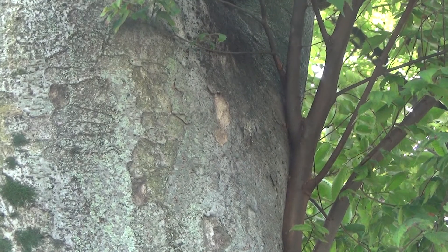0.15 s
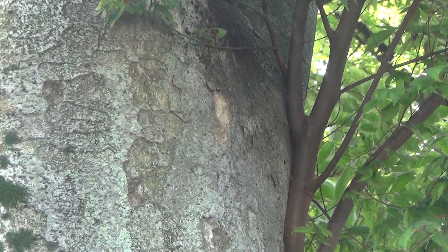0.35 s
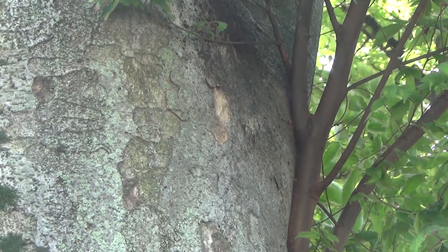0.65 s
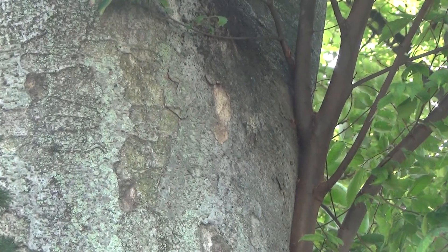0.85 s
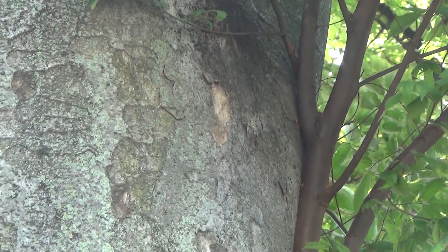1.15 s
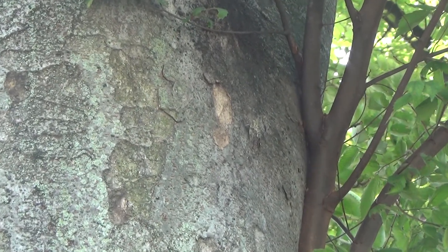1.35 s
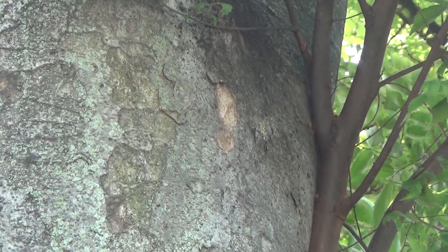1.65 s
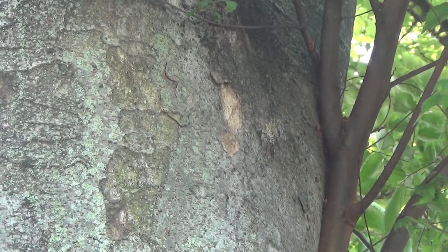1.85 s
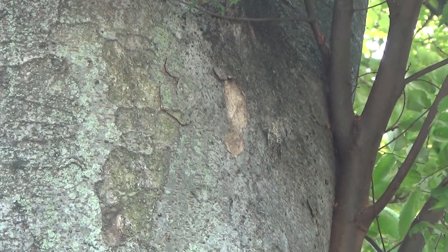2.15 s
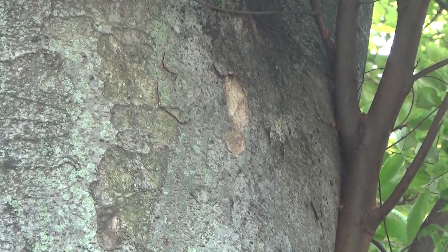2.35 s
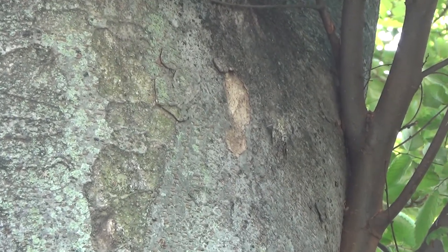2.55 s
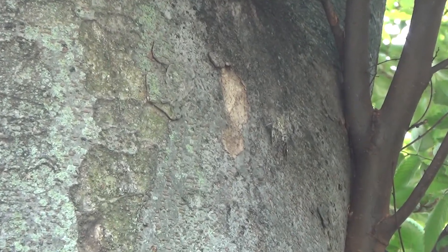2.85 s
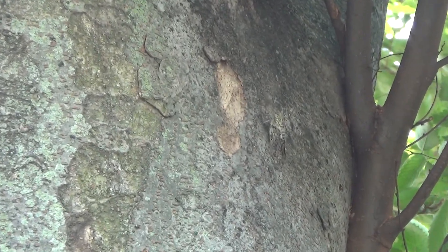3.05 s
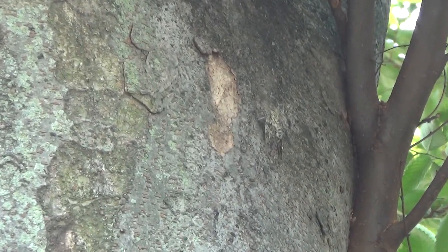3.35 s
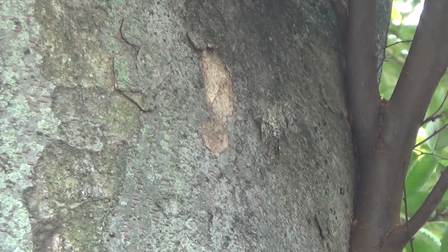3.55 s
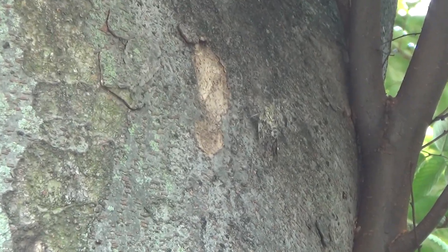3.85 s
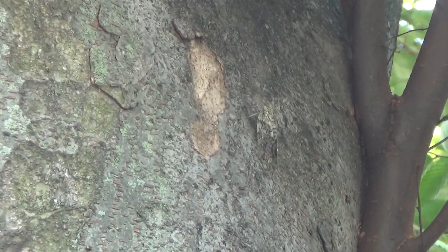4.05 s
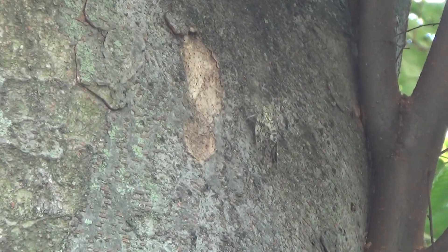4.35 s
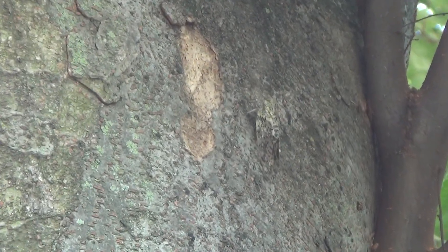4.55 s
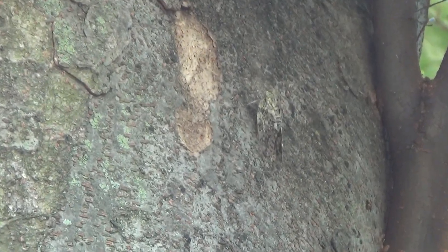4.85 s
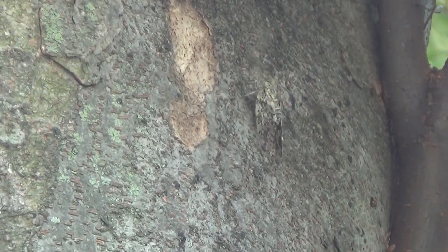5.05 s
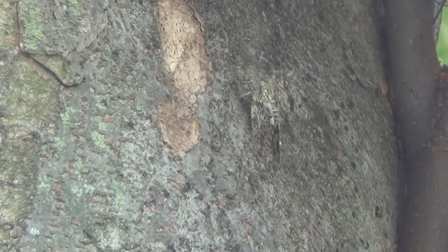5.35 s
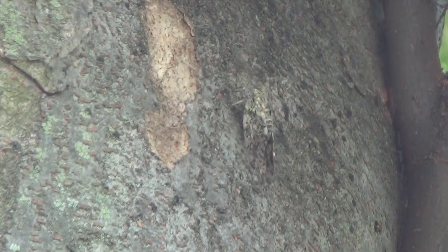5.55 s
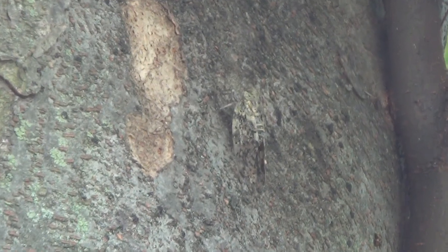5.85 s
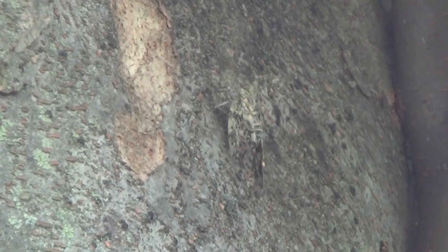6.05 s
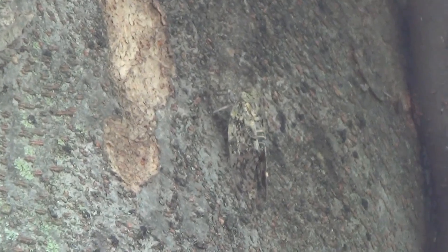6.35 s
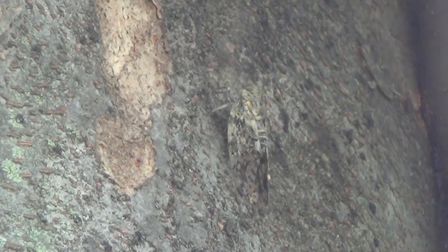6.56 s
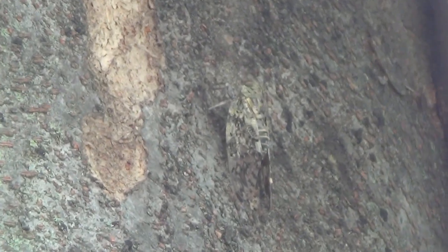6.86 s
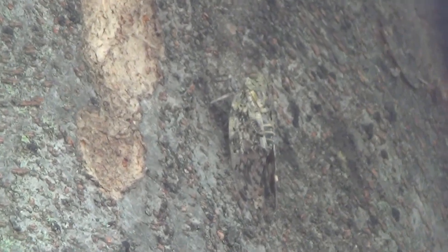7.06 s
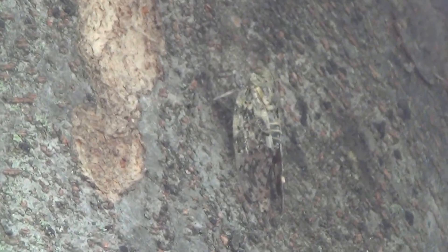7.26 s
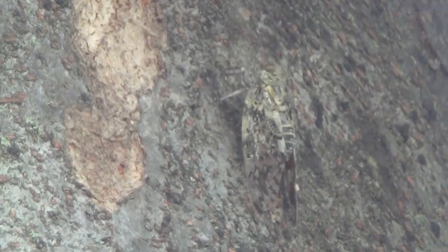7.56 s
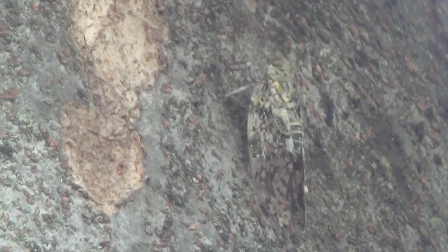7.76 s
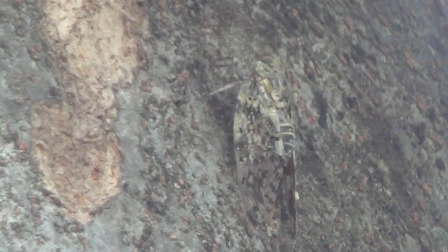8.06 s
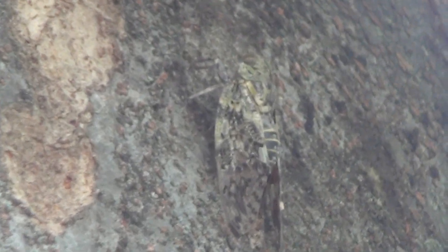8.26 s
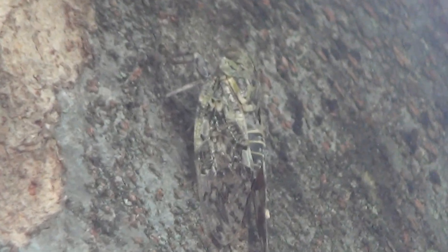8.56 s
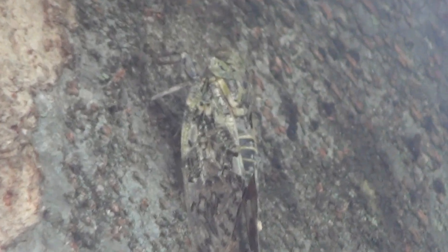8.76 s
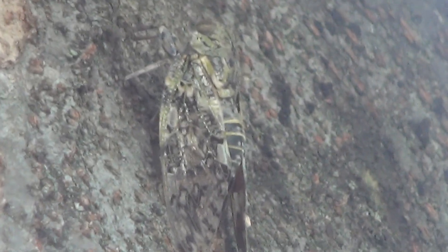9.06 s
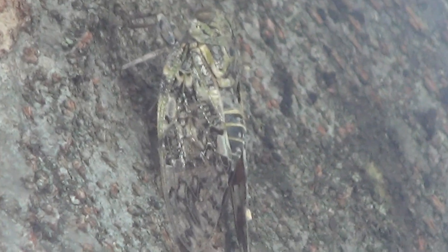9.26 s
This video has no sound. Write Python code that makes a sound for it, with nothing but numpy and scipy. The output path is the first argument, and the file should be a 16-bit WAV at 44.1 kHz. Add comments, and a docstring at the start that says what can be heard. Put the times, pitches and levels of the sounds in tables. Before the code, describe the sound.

A continuous, piercing cicada buzz fills the foreground, centred and nearly dry, with short reflections off trunk and foliage. First rough and throbbing, it tightens and grows slightly louder while its tone lowers; midway it snaps upward into a cleaner, quivering shrill held to the end. Beneath it a vehicle's soft engine drone and tyre roar swell and fade to the left in faint open air, heard on a close stereo microphone.

```python
"""A harsh cicada buzz, close by, quickens and sinks in pitch, then snaps up to a brighter, fluttering shrill.
Its tymbals click some 500 times a second, and each click rings the hollow abdomen; trunk, ground and leaves echo it.
Behind it a motor vehicle passes faintly, leaning to the left: filtered-noise rumble and tyres, exhaust harmonics
and a transmission whine. Shaped noise gives a faint hush of open air."""
import sys
import numpy as np
from scipy import signal
from scipy.fft import rfft, irfft
from scipy.io import wavfile
from scipy.ndimage import uniform_filter1d, minimum_filter1d

SR = 44100
rng = np.random.default_rng(int(sys.argv[2]) if len(sys.argv) > 2 else 0)


def bounce(signal):
    """Save signal as a 16-bit WAV file at the path given by the first command-line argument."""
    frames = np.transpose(np.atleast_2d(signal))
    limited = np.clip(frames, -1, 1)
    pcm = np.round(limited * 32767).astype(np.int16)
    wavfile.write(sys.argv[1], SR, pcm)


N = 415422
TIME = np.arange(N) / SR

# song phrases; clicks run early and late in a fast flutter and a slow throb:
# (start [s], ring time [ms], roughness [0-1], second rib click [dB], abdomen stretch [0-1],
#  flutter rate [Hz], flutter depth [us], throb rate [Hz], throb depth [us])
PHRASES = [(0, 0.22, .52, -34, 0.3, 70.4, 17, 35.8, 95), (2.15, 0.21, .46, -16, 0.16, 125, 9.4, 30, 97),
           (4.621, 0.18, .08, -18, 0.83, 81.9, 42.6, 20, 7.9),
           (5.582, 0.18, .3, -27, 1, 77.2, 30.5, 24, 20.8),
           (6.221, 0.19, 0.27, -12, 0.96, 110.2, 24.4, 29, 10.5)]
# radiation of the slack abdomen: (frequency [Hz], level [dB])
SLACK_ABDOMEN = [(3000, 33), (5200, 4), (5450, -4.5), (5750, -4), (6400, -1), (6900, -1), (7700, 0),
                 (8400, -1), (8700, -2.5), (9100, 1), (9500, -6), (11000, 0), (12500, -1), (15500, 12)]
# radiation of the stretched abdomen: (frequency [Hz], level [dB])
STRETCHED_ABDOMEN = [(3000, -62), (5500, -3), (5950, 6.5), (6250, -2), (6700, 3), (6950, 3.5), (7700, 1.5),
                     (8450, 4.5), (8700, -2), (9100, 5.5), (10400, 3), (10800, 0.5), (12500, 9.5),
                     (15500, 0)]
# the first entry is a further click of a tymbal rib just after each click; the rest are reflections from bark,
# branches and ground: (delay [ms], gain [ratio])
ECHOES = [(.873, .1), (1.44, .15), (1.922, .11), (2.761, .09), (3.469, .1), (7.857, .28)]
# foliage scatter, strongest in the treble: (frequency [Hz], level [dB])
FOLIAGE = [(5500, -2.5), (8000, 2), (10000, 9), (14000, 13)]
# scatter from branches at either side: (frequency [Hz], level [dB])
BRANCHES = [(5500, -6), (7400, 2), (9300, 4), (10500, -25)]
# road rumble spectrum: (frequency [Hz], level [dB])
RUMBLE = [(15, -41), (25, -8), (81, -0.5), (166, -2), (195, -4), (257, -5.5), (295, -9.5), (375, -8.5),
          (500, -11.5), (650, -11), (1100, -120)]
# tyre roar spectrum: (frequency [Hz], level [dB])
TYRES = [(210, -21), (350, -1.5), (478, -8), (624, -2), (738, 1.5), (1140, 1), (1700, -2), (2240, -4),
         (4230, -20), (5000, -31), (6500, -5), (11000, -120)]
# swells of the road noise: (centre [s], half length to 1/e [s], rumble change [dB], tyre change [dB])
SWELLS = [(2.301, 0.31, 1.5, 2), (4.094, 0.65, -1, 2.5), (5.249, 0.37, -6.5, 4.5), (6.091, 0.28, -3, -2.5),
          (6.565, 0.1, 4, 3.5), (7.73, 0.79, 1, 3.5)]
# diffuse share of the road noise: (frequency [Hz], level [dB])
DIFFUSE_ROAD = [(40, -20), (130, -10), (260, -18), (600, -46), (2000, -50)]
# engine: (time [s], cycle rate [Hz], throttle [dB])
ENGINE = [(0, 34.97, -8), (1.7, 36.9, -5.5), (2.25, 38.49, 4), (3.8, 45.9, 2.5), (5.2, 42.48, -3),
          (6.6, 40.51, 0.5), (9.4, 39.57, 4)]
# exhaust tones: (multiple of cycle rate [1], level [dB])
EXHAUST = [(2, 0.5), (3, -1.5), (4, -3.5), (5, -7), (6, -4.5), (7, -14), (8, -14.5), (9, -10.5), (12, -5.5),
           (13, -30), (17, -5), (18, -2)]
# open-air hush spectrum: (frequency [Hz], level [dB])
AIR = [(15, -33), (25, -15), (74, -22.5), (141, -20), (320, -15), (794, -9), (927, -61), (2630, 3),
       (4480, 1), (5000, 2.5), (6500, -41), (11000, -120)]
# microphone ports: (frequency [Hz], left minus right [dB])
PORT_LEVEL = [(60, 1.5), (110, 3.5), (200, 4.2), (380, 3), (700, 2.5), (1290, 1), (2380, 0), (4400, 0.0),
              (8120, -0.4), (15000, 0.0)]

# buzz: one S-curve of effort brings faster clicks, a lower ring, a little more level
BUILD_MID_S, BUILD_WIDTH_S = 1.87, .91
EASY_CLICK_HZ, FULL_CLICK_HZ = 499, 581
EASY_RING_HZ, FULL_RING_HZ = 7840 * .99, 6614 * .99
EASY_DB, FULL_DB = -13, -11.5
# turn to the shrill, then tiring
TURN_S, SNAP_S, RELAX_S, SETTLE_S, SETTLE_SHARE = 4.62, .055, .08, .3, .16
SHRILL_CLICK_HZ, SHRILL_RING_HZ, SHRILL_DB = 496.4, 8152 * .99, -13
TIRING_HZ_PER_S, TIRING_DB_PER_S = 58 * .99, 0.16
FALTER_S, FALTER_WIDTH_S, FALTER_DB = 4.88, 0.16, -1.2
FLUTTER_SAG_HZ_PER_S = 3.8  # the flutter slows through each phrase
EDGE_HZ = 5560  # lowest resonance of the body
# tyres: nearest moment, time to fade by 3 dB; lead of the rumble over the tyres
PASS_S, PASS_WIDTH_S, RUMBLE_LEAD_S = 5.68, 1.31, 0.73
WHINE_START_S, WHINE_DB, WHINE_PEAK_S, WHINE_SPREAD_S = 4.57, -41.5, 4.88, 0.65
WHINE_LOW_HZ, WHINE_HIGH_HZ, WHINE_MID_S, WHINE_WIDTH_S = 1572, 2003, 5.25, .44
TOP_HZ = 15650  # recorder cutoff


def cicada(leaves_db=-8.5):
    """Clicks and their echoes, evened to a running level that follows the insect's effort."""
    click_hz, ring_hz, level_db = effort()
    # so small a body radiates little below its lowest resonance
    highpass = signal.butter(24, EDGE_HZ, "high", fs=SR, output="sos")
    clicks = signal.sosfilt(highpass, tymbals(click_hz, ring_hz))
    song = echoes(clicks) + undb(leaves_db) * leaves(clicks, t60_s=0.12, tint=FOLIAGE)
    running_rms = np.sqrt(uniform_filter1d(song ** 2, size=5000))
    return song / running_rms * undb(level_db)


def tymbals(click_hz, ring_hz, wander=.0035, slip_size_us=28, memory=0.75, weak_db=0.76, flutter_db=0.75,
            flutter_overtone=0.43, pitch_scatter=0.038, sag=0.12, swell=1.66):
    """Buckling clicks, uneven in time and strength, each followed by a second rib's click."""
    start_s, ring_ms, rough, rib_db, stretch, flutter_hz, flutter_us, throb_hz, throb_us = posture()
    turns = np.cumsum(click_hz * (1 + wander * rough * walk(14))) / SR
    t = np.interp(np.arange(1, int(turns[-1])), turns, TIME)

    sagging_hz = flutter_hz - FLUTTER_SAG_HZ_PER_S * (TIME - start_s)
    quiver = angle(sagging_hz * (1 + 0.0063 * walk(8.8)))
    flutter = np.sin(quiver) + flutter_overtone * np.sin(2 * quiver)
    # in each throb the click rate jumps up, then sinks
    beat = angle(throb_hz * (1 + 0.144 * walk(12)))
    throb = sum(np.cos(k * beat) / k ** 2 for k in range(1, 4))
    sway_us = np.interp(t, TIME, flutter_us * flutter + throb_us * throb)

    # curves sampled at the clicks
    curves = (flutter_db * flutter, ring_hz, ring_ms, rough, rib_db)
    force_db, ring_hz, ring_ms, rough, rib_db = (np.interp(t, TIME, c) for c in curves)
    chance = rng.standard_normal((len(t), 5)).T
    # a late click delays the ones after it
    slip_us = signal.lfilter([1], [1, -np.clip(memory, 0, .98)], slip_size_us * rough * chance[0])
    onset_s = t + (sway_us + slip_us) / 10 ** 6
    ring_s = ring_ms / 1000
    rib_lag_s = .00081 * (1 + .04 * chance[4])
    # most clicks are near full; now and then the tymbal only half buckles
    size = undb(force_db - weak_db * np.sqrt(np.abs(rough)) * chance[1] ** 2)
    rib_size = size * undb(rib_db + 2 * chance[3])
    pitch_hz = ring_hz * (1 + pitch_scatter * rough * chance[2])

    clicks = rings(onset_s, size, pitch_hz, ring_s, sag, swell)
    clicks = clicks + rings(onset_s + rib_lag_s, rib_size, pitch_hz, ring_s, sag, swell)
    # stretching the abdomen chokes its low resonances
    stretch = np.clip(stretch, 0, 1)
    return blend(colour(clicks, SLACK_ABDOMEN), colour(clicks, STRETCHED_ABDOMEN), stretch)


def rings(times_s, sizes, pitch_hz, ring_s, sag, swell, size=200):
    """Each click swells and dies in the abdomen, its pitch sagging as the rib gives way."""
    index = np.ceil(times_s * SR).astype(int)[:, None] + np.arange(size)
    age_s = np.maximum(index / SR - times_s[:, None], 0)
    life = age_s / ring_s[:, None]
    cycles = pitch_hz[:, None] * (age_s + sag * ring_s[:, None] * life * np.exp(-life / 2))
    envelope = sizes[:, None] * life ** swell * np.exp(-life)
    waves = envelope * np.sin(2 * np.pi * cycles)
    # overlapping rings add; samples outside the scene go to a spare or end bin
    return np.bincount(np.clip(index, 0, N).ravel(), waves.ravel(), N + 1)[:N]


def effort():
    """Click rate, ring pitch and level: all follow the build-up, then give way to the shrill."""
    build, snap, since_s = rise(BUILD_MID_S, BUILD_WIDTH_S), settle(TURN_S, SNAP_S), TIME - TURN_S
    # the muscles let go quickly at first, then settle slowly
    relax = blend(settle(TURN_S, RELAX_S), settle(TURN_S, SETTLE_S), SETTLE_SHARE)
    click_hz = blend(blend(EASY_CLICK_HZ, FULL_CLICK_HZ, build), SHRILL_CLICK_HZ, relax)
    shrill_hz = SHRILL_RING_HZ - TIRING_HZ_PER_S * since_s
    ring_hz = blend(blend(EASY_RING_HZ, FULL_RING_HZ, build), shrill_hz, snap)
    shrill_db = SHRILL_DB - TIRING_DB_PER_S * since_s
    level_db = blend(blend(EASY_DB, FULL_DB, build), shrill_db, snap)
    # the song falters just after the turn
    return click_hz, ring_hz, level_db + FALTER_DB * bump(FALTER_S, FALTER_WIDTH_S)


def posture():
    """Phrase columns at every moment; each phrase snaps in exponentially from the one before."""
    rows = np.array(PHRASES)
    snaps = np.array([settle(s, SNAP_S) for s in rows[1:, 0]])
    return rows[0][:, None] + np.diff(rows, axis=0).T @ snaps


def echoes(x):
    """The direct sound, a rib's quick after-click and a few hard reflections, as delays in the spectrum."""
    khz = np.fft.rfftfreq(N, 1 / SR) / 1000
    reflections = sum(gain * np.exp(-2j * np.pi * khz * ms) for ms, gain in ECHOES)
    return irfft(rfft(x) * (1 + reflections), N)


def leaves(x, t60_s, tint):
    """Short, dense scatter from bark and foliage: convolution with decaying noise."""
    t = TIME[:SR // 4]
    scatter = rng.standard_normal(len(t)) * np.exp(-np.log(1000) * t / t60_s)
    return colour(signal.fftconvolve(x, scatter / np.linalg.norm(scatter))[:N], tint)


def road(rumble_db=-44.0, tyre_db=-39.5, rumble_width_s=5, throttle_share=0.17, grain_db=1.0, clatter_db=1.025):
    """Far-carrying rumble and grainy tyre roar come and go; a clatter follows the engine cycle."""
    cycle_hz, throttle_db = read(ENGINE, TIME)
    rumble_pass_db = passing(PASS_S - RUMBLE_LEAD_S, rumble_width_s)
    rumble_level_db = rumble_db + throttle_share * throttle_db + rumble_pass_db
    tyre_level_db = tyre_db + passing(PASS_S, PASS_WIDTH_S)
    for at_s, width_s, low_db, high_db in SWELLS:
        swell = bump(at_s, width_s)
        rumble_level_db = rumble_level_db + low_db * swell
        tyre_level_db = tyre_level_db + high_db * swell
    crank = angle(cycle_hz)
    clatter = clatter_db * (np.cos(crank) + np.cos(2 * crank) + np.cos(4 * crank))
    rumble = noise(RUMBLE) * undb(rumble_level_db + 1.2 * walk(9))
    return rumble + noise(TYRES) * undb(tyre_level_db + clatter + grain_db * walk(70))


def motor(exhaust_db=-44, nearest_s=5.1, width_s=1.2, dulling=0.14):
    """Exhaust tones at multiples of the engine cycle, swelling as the vehicle goes by."""
    cycle_hz, throttle_db = read(ENGINE, TIME)
    crank = angle(cycle_hz * (1 + 0.00399 * walk(8)))
    far_db = passing(nearest_s, width_s)
    tones = 0
    for k, db in EXHAUST:
        # with distance the upper tones fade faster than the low ones
        gain = undb(db + k * dulling * far_db + 2.05 * walk(6.2))
        tones = tones + gain * np.sin(k * crank + rng.uniform(0, 2 * np.pi))
    return unit(tones) * undb(exhaust_db + throttle_db + far_db)


def whine(waver=0.0181, attack_s=0.019, patchy_db=2):
    """Transmission whine: a wavering, patchy sine that sets in suddenly, climbs and fades with distance."""
    hz = blend(WHINE_LOW_HZ, WHINE_HIGH_HZ, rise(WHINE_MID_S, WHINE_WIDTH_S))
    sine = np.sin(angle(hz * (1 + waver * walk(150))))
    tone = unit(sine * undb(2.46 * walk(40) + patchy_db * walk(7)))
    return tone * settle(WHINE_START_S, attack_s) * undb(WHINE_DB + passing(WHINE_PEAK_S, WHINE_SPREAD_S))


def passing(nearest_s, width_s):
    """Level in dB of a source that drives by, falling as 1 / distance; 0 when nearest."""
    return -20 * np.log10(np.hypot(1, (TIME - nearest_s) / width_s))


def noise(points):
    """Coloured noise of rms 1."""
    return unit(colour(rng.standard_normal(N), points))


def colour(x, points):
    """Filter by a spectrum of (frequency [Hz], level [dB])."""
    return irfft(rfft(x) * undb(across(points)), N)


def across(points):
    """A table of (frequency [Hz], value) spread over all bins, linear in log frequency."""
    hz, value = np.transpose(points)
    return np.interp(np.log(np.maximum(np.fft.rfftfreq(N, 1 / SR), 1)), np.log(hz), value)


def undb(db):
    """Decibels to gain."""
    return 10 ** (np.asarray(db) / 20)


def unit(x):
    """Scale to rms 1."""
    return x / np.sqrt(np.mean(x ** 2))


def read(table, t):
    """The columns of a curve at times t."""
    s, *columns = np.transpose(table)
    return [np.interp(t, s, c) for c in columns]


def walk(rate_hz):
    """Smooth chance of rms 1, changing about rate_hz times a second."""
    k = int(SR / rate_hz)
    steps = np.repeat(rng.standard_normal(N // k + 1), k)
    return unit(uniform_filter1d(steps, k)[:N])


def angle(hz):
    """Running phase of a frequency curve."""
    return 2 * np.pi * np.cumsum(hz) / SR


def rise(mid_s, width_s):
    """An S-curve from 0 to 1."""
    return (1 + np.tanh((TIME - mid_s) / width_s / 2)) / 2


def settle(start_s, lag_s):
    """0 until the start, then an exponential approach to 1."""
    return 1 - np.exp(-np.maximum(TIME - start_s, 0) / lag_s)


def bump(at_s, width_s):
    """A bell curve of height 1."""
    return np.exp(-((TIME - at_s) / width_s) ** 2)


def blend(a, b, share):
    """From a to b as the share goes from 0 to 1."""
    return a + (b - a) * share


def ports(mid, side):
    """Two close ports hear slightly different levels; diffuse sound differs between them."""
    half = undb(across(PORT_LEVEL) / 2)
    left = irfft(rfft(mid) * half, N) + side
    right = irfft(rfft(mid) / half, N) - side
    return np.array([left, right])


def scene(air_db=-56, scatter_db=-26, leftward=0.28, turn_width_s=0.16):
    """Cicada, a vehicle that moves over to the left and the faint hush of open air."""
    song = cicada()
    vehicle = road() + motor() + whine()
    mid = song + vehicle + undb(air_db) * noise(AIR)
    scatter = undb(scatter_db) * leaves(song, t60_s=0.041, tint=BRANCHES)
    diffuse = colour(road(), DIFFUSE_ROAD)  # independent noise, so it widens the road
    lean = leftward * rise(PASS_S - RUMBLE_LEAD_S, turn_width_s) * vehicle
    return ports(mid, scatter + diffuse + lean)


def record(dry):
    """A fast limiter evens out the tallest clicks, and the recorder cuts the top."""
    ceiling = .72
    gain = ceiling / np.maximum(np.abs(dry).max(axis=0), ceiling)
    held = minimum_filter1d(gain, size=110)
    gain = uniform_filter1d(uniform_filter1d(held, size=80), size=50)
    lowpass = signal.ellip(10, .2, 80, TOP_HZ, fs=SR, output="sos")
    return signal.sosfilt(lowpass, dry * gain)


dry = scene()
out = record(dry)
bounce(out)
```